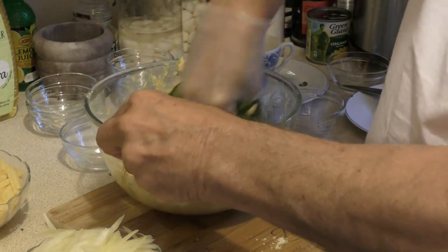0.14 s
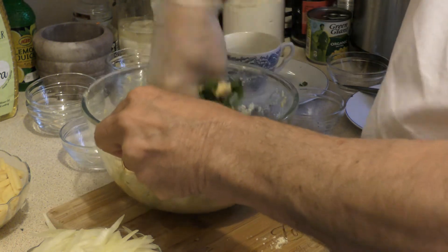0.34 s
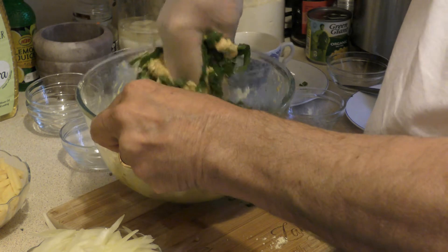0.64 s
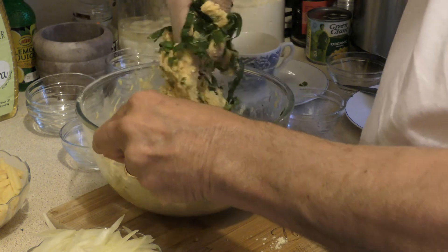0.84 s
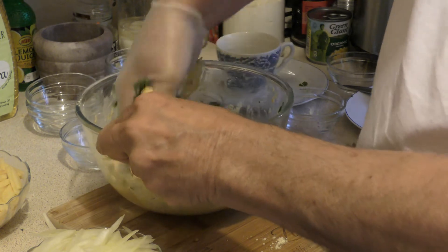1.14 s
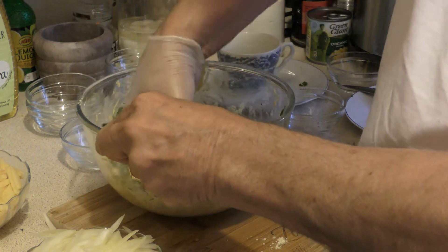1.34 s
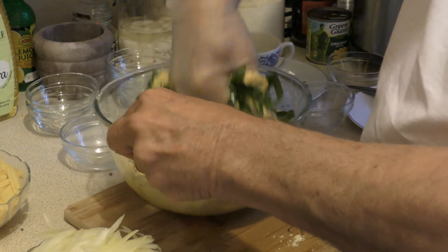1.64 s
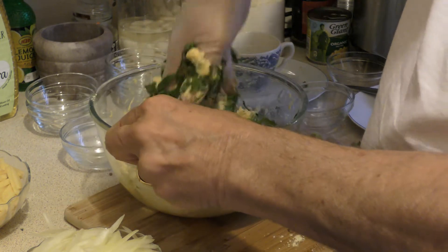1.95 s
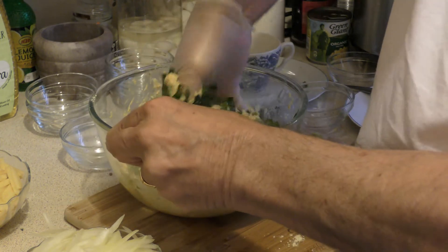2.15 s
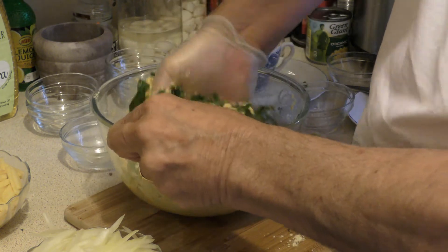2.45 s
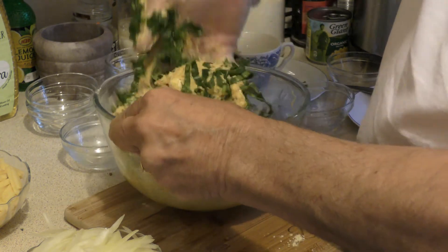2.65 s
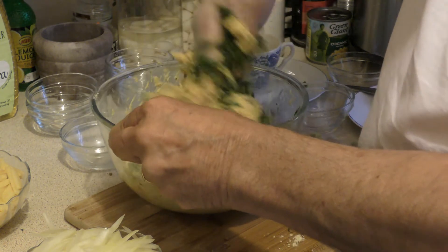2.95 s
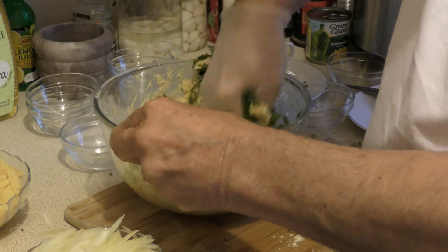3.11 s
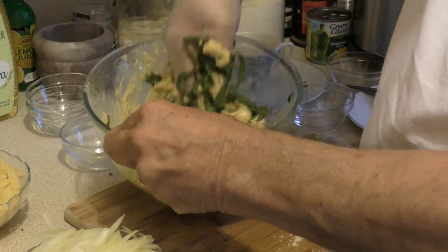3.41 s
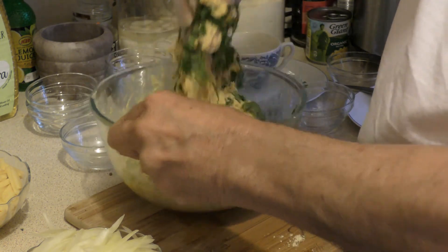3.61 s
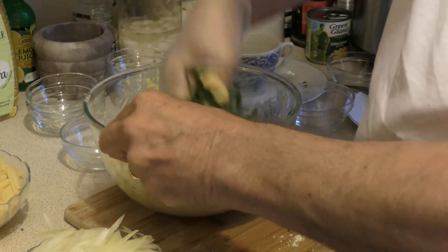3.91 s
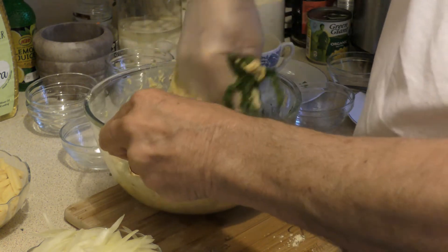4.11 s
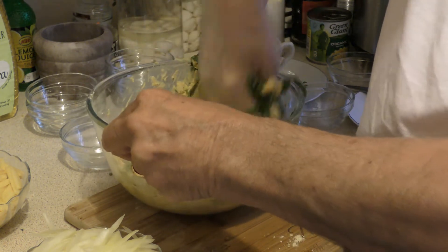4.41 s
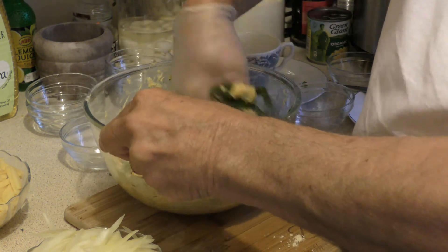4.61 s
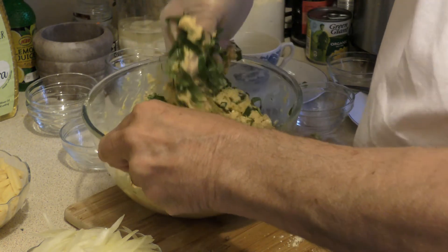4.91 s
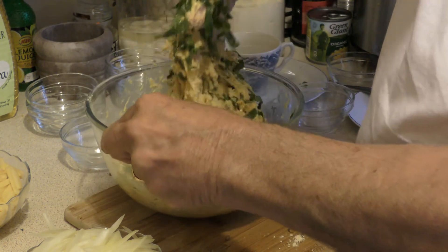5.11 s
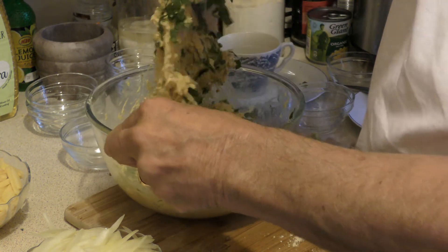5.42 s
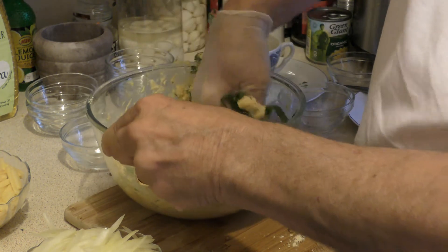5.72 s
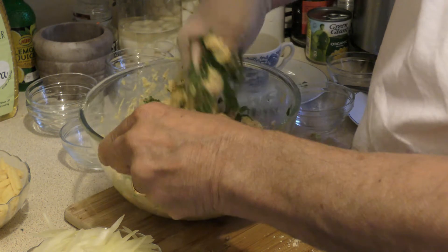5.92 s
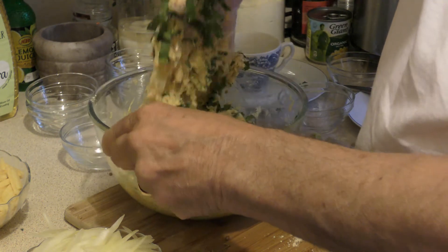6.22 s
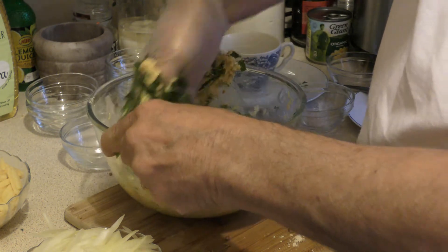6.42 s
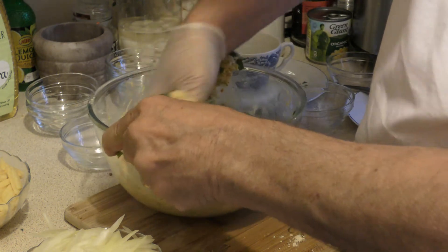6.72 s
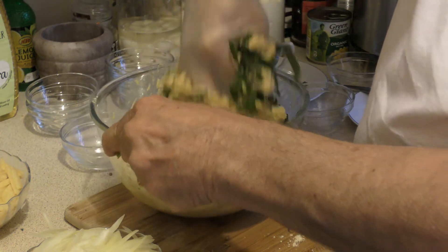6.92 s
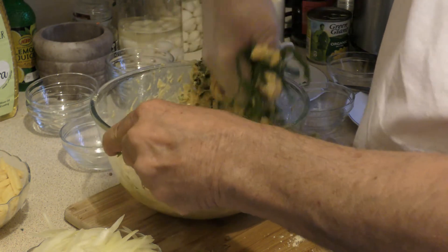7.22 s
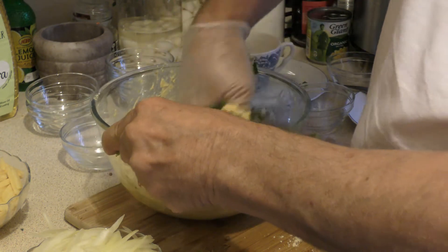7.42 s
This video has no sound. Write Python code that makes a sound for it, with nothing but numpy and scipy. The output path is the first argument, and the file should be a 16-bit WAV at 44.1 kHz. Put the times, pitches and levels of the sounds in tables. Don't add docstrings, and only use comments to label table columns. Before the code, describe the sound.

A glass bowl knocks irregularly on a wooden board as a gloved hand squeezes wet, crackling batter; one bright clink against glass dishes in a small kitchen.

```python
import sys
import numpy as np
from scipy import signal
from scipy.fft import rfft, irfft, next_fast_len
from scipy.io import wavfile
from scipy.ndimage import uniform_filter1d

SR = 44100
rng = np.random.default_rng(int(sys.argv[2]) if len(sys.argv) > 2 else 0)


def ratio(d):
    e = np.asarray(d, float) / 20
    return 10 ** e


def store_wav(level_fs):
    pcm = np.round(np.clip(np.atleast_2d(level_fs), -1, 1) * 32767)
    wavfile.write(sys.argv[1], SR, pcm.T.astype(np.int16))


N = 332954

# t/s, blow/dB, counter thump/dB, crack/dB, first edge/dB
DROPS = [
    (0.796, -8, -21, -13, -40),
    (1.604, -13.5, -23.5, -10, -22),
    (2.849, -11, -19, -57, -12),
    (3.652, -6.5, -23.5, -21, -57),
    (4.292, -19.5, -16, -29, -19.5),
    (5.081, -9, -17.5, -29, -12.5),
    (6.136, -11, -15.5, -47, -33),
    (7.139, -14.5, -14, -39, -9),
]
# main board pitch f/Hz, ring/dB, rebound delay/s, rebound/dB
DROP_RINGS = [(1006, -8, .0016, -1.5), (1423, -7.5, 0.00119, -8.5), (1380, -7, .002, -7),
              (1288, -8, .0018, -5), (1380, -8, .002, -10), (1330, -10.5, .0015, -10),
              (1374, -14.5, 0.00201, -9.5), (1340, -5, 0.00155, -9)]
# f/Hz, width/Hz, level/dB
BOARD_MODES = [(760, 260, -14), (980, 240, -4), (1160, 260, -4), (1380, 260, 1), (1600, 320, -5),
               (1830, 340, -6), (2090, 380, -6), (2450, 480, -8), (2920, 560, -6), (3480, 750, -7),
               (4300, 1000, -8), (5600, 1500, -11)]
# f/Hz, width/Hz, level/dB
COUNTER_MODES = [(109, 61, -6), (182.5, 54, -0.5), (242, 144, 11.5), (361.7, 61, 2), (448, 83, 4)]
CLINK_S = 1.604


def unit_rms(x):
    return x / np.sqrt(np.mean(x ** 2) + 1e-20)


def unit_peak(x):
    return x / np.max(abs(x))


def read(points, hz):
    f, value = np.transpose(points)
    return np.interp(np.log(hz + 1), np.log(f + 1), value)


def add(mix, s, sound):
    part = mix[..., max(round(s * SR), 0):][..., :sound.shape[-1]]
    part += sound[..., :part.shape[-1]]


def colour(x, gain_db):
    size = next_fast_len(N)
    gain = ratio(gain_db(np.fft.rfftfreq(size, 1 / SR)))
    return irfft(rfft(x, size) * gain, size)[..., :N]


def causal(x, gain_db):
    log_gain = np.log(ratio(gain_db(abs(np.fft.fftfreq(4096, 1 / SR)))))
    taps = np.fft.ifft(np.exp(np.conj(signal.hilbert(log_gain)))).real[:2048]
    return signal.oaconvolve(x, taps)[:N]


def band(x, order, edges_hz):
    return signal.lfilter(*signal.butter(order, edges_hz, "band", fs=SR), x)


def whitened(x, size):
    z = rfft(x)
    return irfft(z / np.sqrt(uniform_filter1d(abs(z) ** 2, size=size)))


def grains(per_s, spread_db):
    draw, size, sign = rng.random((N, 3)).T
    level = ratio(-spread_db * np.log(size + 0.0037))
    return (draw < per_s / SR) * level * np.sign(sign - .5)


def resonate(x, hz, width_hz):
    turn = np.exp(2j * np.pi * np.cumsum(hz) / SR)
    r = np.exp(-np.pi * width_hz / SR)
    return 2 * (turn * signal.lfilter([1 - r], [1, -r], x / turn)).real


def ring(modes, chance, spread_db, damping):
    hz, width_hz, db = np.transpose(modes)[:, :, None]
    t = np.arange(4000) / SR
    u, v = chance[:, :len(modes), None] - .5
    sign = (-1.) ** np.arange(len(modes))[:, None]
    decay = np.exp(-np.pi * damping * width_hz * t)
    tones = np.sin(2 * np.pi * hz * (1 + .05 * v) * t)
    return unit_peak((sign * ratio(db + spread_db * u) * decay * tones).sum(0))


def hum():
    # f/Hz, density/dB
    hum_db = [(12, -37), (20, -12), (53, -4), (198, -6), (285, -12), (347, 0), (377, -14), (472, -11),
              (574, -28), (849, -22), (1090, -9), (1760, -15), (2910, -11), (4300, -25), (16000, -27)]
    # f/Hz, correlation/1
    likeness = [(60, 0.24), (180, 0.67), (550, 0.4), (1650, 0.57), (4970, 0.3), (15000, 0.24)]
    frames, hz = N // 256 + 5, np.fft.rfftfreq(1024, 1 / SR)
    a, b, c, d, patches = rng.standard_normal((frames, 513, 5)).T
    patches = uniform_filter1d(patches, size=12, axis=0)
    patches = unit_rms(uniform_filter1d(patches, size=14, axis=1))
    same = np.clip(read(likeness, hz), -1, 1)[:, None]
    left = a + 1j * b
    z = np.array([left, same * left + np.sqrt(1 - same ** 2) * (c + 1j * d)])
    z *= ratio(read(hum_db, hz)[:, None] + patches)
    return ratio(-57.5) * unit_rms(signal.istft(z, nperseg=1024, noverlap=768)[1][:, :N])


def kitchen(x, alike):
    # f/Hz, t60/s
    room_t60_s = [(100, 0.49), (260, 0.29), (700, 0.31), (1840, 0.31), (4850, 0.23), (12000, 0.063)]
    taps = np.zeros((6, SR // 2))
    at = np.arange(120, SR // 2 - 20, 20) + rng.integers(0, 20, (6, (SR // 2 - 121) // 20))
    np.put_along_axis(taps, at, rng.choice([-1., 1.], at.shape), 1)
    alike = np.clip(alike, 0, 1)
    taps = np.sqrt(alike) * taps[[0, 0, 1, 1]] + np.sqrt(1 - alike) * taps[2:]
    hz, t, z = signal.stft(taps, SR, nperseg=256)
    tail = signal.istft(z * ratio(-60 * t / read(room_t60_s, hz)[:, None]), SR, nperseg=256)[1]
    turn = 2 * np.pi * .31 * np.arange(N) / SR
    shares = x * np.array([np.cos(turn), np.cos(turn), np.sin(turn), np.sin(turn)])
    wet = signal.fftconvolve(shares, tail / np.linalg.norm(tail[0]), axes=1)[:, :N]
    return wet[:2] + wet[2:]


def clink():
    # f/Hz, level/dB
    glass_modes = [(2286, -53.5), (2387, -52), (2451, -59), (2885, -58), (3160, -60), (3440, -58),
                   (4027, -64), (4452, -65), (4786, -62), (4818, -43.5), (4894, -54), (5766, -61),
                   (5960, -61), (6062, -58), (6562, -63), (7320, -59), (7714, -67), (8150, -58),
                   (8220, -52), (8300, -56), (9300, -72), (10600, -71), (12350, -65), (13030, -71),
                   (14090, -69), (15040, -69)]
    # f/Hz, t60/s
    glass_t60_s = [(2300, .42), (3500, .3), (4850, .6), (6000, .3), (8200, .42), (12000, .3), (15000, .3)]
    hz, db = np.transpose(glass_modes)[:, :, None]
    t = np.arange(SR // 2) / SR
    strike = (1 + 4 * (hz < 3000) * np.exp(-t / 0.005)) * (1 - np.exp(-t / 0.00018))
    wander = uniform_filter1d(rng.standard_normal((len(glass_modes), SR // 2)), size=600)
    flutter = ratio(1.8 * unit_rms(wander))
    decay = ratio(db - 60 * t / read(glass_t60_s, hz))
    tone = (decay * strike * flutter * np.sin(2 * np.pi * hz * t)).sum(0)
    stilled_db = -110 * np.maximum(t + CLINK_S - 1.74, 0)
    out = np.zeros(N)
    add(out, CLINK_S, ratio(19.5 + stilled_db) * tone)
    return out


def spray(db, t60_s, band_hz):
    t = np.arange(14000) / SR
    a, b, c, grain = rng.standard_normal((4, 14000))
    grain_db = 3.0 * unit_rms(uniform_filter1d(grain, size=90))
    noise = np.array([a + .45 * b, a + .45 * c]) * ratio(grain_db)
    noise = unit_rms(band(noise, 2, band_hz))
    return ratio(db - 60 * t / t60_s) * (1 - np.exp(-t / 0.0037)) * noise


def washes():
    out = np.zeros((2, N))
    for s, db, *_ in DROPS:
        add(out, s, spray(db - 27, t60_s=0.35, band_hz=(890, 3800)))
    add(out, CLINK_S, spray(-30, t60_s=0.3, band_hz=(2200, 8340)))
    return out


def ping(db, hz, t60_s, rise_cycles):
    t = np.arange(round(np.clip(t60_s, .01, .4) * SR)) / SR
    sway = 1 + .12 * unit_rms(uniform_filter1d(rng.standard_normal(18000), size=120))[:len(t)]
    shape = (1 - np.exp(-t * hz / rise_cycles)) * ratio(-60 * t / (len(t) / SR))
    return ratio(db) * unit_peak(shape * np.sin(2 * np.pi * np.cumsum(hz * sway) / SR))


def lumps():
    # t/s, peak/dB, f/Hz, t60/s
    lump_rows = [(0.354, -45, 334, 0.12), (0.389, -43, 420, 0.12), (0.796, -14, 342, 0.12),
                 (1.792, -41, 310, 0.11), (2.547, -40, 170, 0.11), (2.846, -29, 221, 0.12),
                 (3.651, -18.5, 490, 0.11), (3.704, -28, 266, 0.14), (3.739, -32, 541, 0.14),
                 (3.774, -33, 513, 0.12), (3.804, -27, 143, 0.12), (3.819, -35, 119, 0.12),
                 (3.97, -41, 302, 0.12), (4.056, -44, 339, 0.11), (4.526, -45, 350, 0.16),
                 (5.076, -17.5, 263, 0.16), (5.119, -28, 355, 0.12), (6.133, -26, 260, 0.13),
                 (7.134, -18.5, 353, 0.17), (7.174, -29, 237, 0.1)]
    # t/s, peak/dB, f/Hz, t60/s
    wobble_rows = [
        (0.79, -36, 59.5, .1),
        (0.96, -52, 60, .2),
        (1.6, -47, 50, 0.085),
        (3.79, -49, 55, .3),
        (5.1, -54, 50, 0.38),
        (6.17, -49, 59.6, .3),
        (7.2, -57, 50, .3),
    ]
    # t/s, peak/dB, f/Hz, t60/s
    tap_rows = [(0.195, -35, 1150, 0.058), (1.272, -31, 1880, 0.046), (1.953, -32, 1870, 0.05),
                (2.146, -38, 1950, 0.05), (2.1919, -34, 2010, 0.05), (2.2782, -37.5, 2040, 0.05),
                (2.3494, -44, 1670, 0.05), (2.4494, -41, 1670, 0.05), (3.057, -38.5, 1340, 0.054),
                (3.7094, -22, 1670, 0.05), (3.929, -26.5, 2300, 0.058), (3.9709, -30, 1330, 0.05),
                (4.1494, -43, 2730, 0.05), (4.5994, -47, 1540, 0.05), (4.803, -46, 1160, 0.05),
                (4.8394, -39, 1160, 0.05), (5.1694, -29, 1140, 0.046), (5.252, -34, 1130, 0.05),
                (7.2174, -27, 1046, 0.05), (7.4036, -39, 1280, 0.05)]
    out = np.zeros(N)
    for (s, db, *_), (hz, ring_db, *_) in zip(DROPS, DROP_RINGS):
        add(out, s + 0.00058, ping(db + ring_db, hz, t60_s=0.023, rise_cycles=1.3))
    add(out, 6, ping(-23.5, 780, t60_s=0.32, rise_cycles=0.95))
    groups = ((lump_rows, -8.0, .55, .5), (wobble_rows, 0.0, .9, .8), (tap_rows, -11.0, .35, 1.2))
    for rows, trim_db, damped, rise_cycles in groups:
        for s, db, hz, t60_s in rows:
            add(out, s - .001, ping(db + trim_db, hz, damped * t60_s, rise_cycles))
    return out


def slides():
    # t/s, level/dB, chatter f/Hz, rasp re chatter/dB
    skid_tables = [
        [(0.0, -21.5, 780, -24), (0.02, -38.5, 765, -45), (0.1, -61, 740, -24)],
        [(0.6, -66, 1270, 2), (0.606, -67, 1280, -11), (0.626, -60, 1140, -31), (0.68, -41.5, 1170, -48),
         (0.77, -34.5, 1310, -41), (0.79, -45, 1440, 4)],
        [(0.82, -46, 1250, 6), (0.932, -45.5, 1230, -1.5), (0.974, -46.5, 1360, -3), (1.112, -60, 1200, -25),
         (1.21, -75, 1200, -17)],
        [(1.515, -52, 1180, -14), (1.525, -45.5, 1230, 2.5), (1.559, -43, 1560, 6), (1.597, -43.5, 1560, 4),
         (1.6, -9, 1710, 9)],
        [(3.62, -71, 1870, -18), (3.626, -40.5, 2000, 3), (3.642, -62, 1840, -16), (3.645, -43, 1760, -13)],
        [(3.68, -42, 1670, -16), (3.75, -36.5, 1600, -6.5), (3.83, -46, 1570, -3.5), (3.9, -101, 1380, -25)],
    ]
    out, slips = np.zeros(N), grains(6000, spread_db=0.0)
    rasp = signal.sosfilt(signal.butter(2, [500, 4300], "band", fs=SR, output="sos"), slips)
    for rows in skid_tables:
        s, *columns = np.transpose(rows)
        t = np.arange(s[0], s[-1], 1 / SR)
        db, hz, rasp_db = (np.interp(t, s, c) for c in columns)
        start = round(s[0] * SR)
        part = slice(start, start + len(t))
        chatter = resonate(resonate(slips[part], hz, 450), hz, 700)
        chatter = chatter + .35 * resonate(slips[part], 1.55 * hz, 250)
        sound = unit_rms(chatter) + ratio(rasp_db + 8.0) * unit_rms(rasp[part])
        add(out, s[0], ratio(db - 9.0) * sound * signal.windows.tukey(len(t), .12))
    rub = slips[:round((1.22 - .9) * SR)]
    song = unit_rms(resonate(rub, np.full(len(rub), 2310), 25))
    add(out, .9, ratio(-59) * np.hanning(len(rub)) * song)
    return out


def hand(column, clumpy_db):
    # full grip t/s, let-go time/s, push on the bowl/dB, wet squelch/dB
    squeeze_rows = [(0.005, 0.12, -43, -58), (0.258, 0.62, -56, -53), (0.39, 0.12, -51.5, -67),
                    (0.71, 0.22, -41, -51.5), (0.95, 0.23, -40, -79), (1.1, 0.15, -46, -57),
                    (1.253, 0.33, -55.5, -55.5), (1.53, 0.15, -57, -52.5), (1.8, 0.65, -54, -57.5),
                    (1.964, 0.096, -53, -54), (2.15, 0.68, -52.5, -57), (2.35, 0.91, -74, -57.5),
                    (2.59, 0.4, -52.5, -56.5), (3.06, 0.13, -54, -57.5), (3.198, 0.12, -48, -46),
                    (3.37, 0.95, -56.5, -57), (3.6, 0.23, -60, -64), (3.931, 0.12, -47, -55.5),
                    (4.14, 0.61, -52.5, -57), (4.52, 0.31, -55, -56), (4.81, 0.61, -51, -54.5),
                    (5.25, 0.24, -62, -83), (5.68, 0.1, -47, -56), (5.881, 0.33, -51, -58.5),
                    (6.1, 0.58, -58, -61), (6.48, 0.36, -55.5, -61), (6.78, 0.4, -53.5, -56),
                    (7.04, 0.51, -82, -57.5), (7.3, 0.45, -76, -58), (7.42, 0.65, -54, -55.5)]
    s, let_go_s, db = np.transpose(squeeze_rows)[[0, 1, column], :, None]
    hop = 300
    clumps = unit_rms(uniform_filter1d(rng.standard_normal(N // hop + 2), size=4))
    steps = np.arange(len(clumps))
    since = (steps * hop / SR - s) / let_go_s
    grip = ratio(db - 20.5 * np.maximum(since, -since / 0.61))
    rest = ratio(-74)
    level = np.sqrt((grip ** 2).sum(0) + rest ** 2) * ratio(clumpy_db * clumps)
    return np.interp(np.arange(N) / hop, steps, level)


def drag():
    flat = np.full((2, 16), .5)
    board = ring(BOARD_MODES, flat, spread_db=0, damping=5.3)
    counter = ring(COUNTER_MODES, flat, spread_db=0, damping=0.13)
    wood = signal.oaconvolve(grains(2500, spread_db=3.0), board)[:N]
    low = signal.oaconvolve(grains(300, spread_db=-6.0), counter)[:N]
    push = np.minimum(hand(column=2, clumpy_db=2.5), ratio(-48))
    load = (hand(column=2, clumpy_db=4.5) / ratio(-52.5)) ** 0.85
    return ratio(-7.5) * push * unit_rms(wood) + ratio(-71.5) * load * unit_rms(low)


def squeeze():
    # f/Hz, density/dB
    fizz_db = [(880, -78), (1500, 1), (2040, 0), (2660, -3.5), (2970, -0.5), (4500, -7), (10100, -8),
               (14100, -12.5), (16000, -17)]
    # t/s, peak/dB, f/Hz, band spread factor/1
    pop_rows = [(0.127, -45, 9200, 1.8), (0.241, -31, 4650, 1.8), (0.388, -31, 4570, 2.3),
                (0.4403, -37, 6550, 2), (0.525, -46.5, 4100, 1.9), (0.606, -38.5, 4500, 1.95),
                (1.101, -40, 8340, 1.7), (1.2487, -26, 5560, 1.44), (1.5726, -39, 4040, 1.9),
                (1.8886, -41, 5820, 1.4), (2.3466, -42, 4710, 1.44), (2.597, -34, 4860, 2.4),
                (2.6185, -43.5, 4470, 1.1), (3.1996, -29.5, 6330, 1.9), (3.5269, -48, 6990, 1.1),
                (3.602, -34.5, 6900, 1.6), (3.928, -39.5, 7300, 1.12), (4.088, -40, 7740, 1.24),
                (4.3024, -23.5, 6300, 1.48), (4.4844, -44, 6100, 1.6), (6.214, -41, 6860, 1.6),
                (6.4, -47, 5440, 1.2), (6.7774, -38, 10900, 1.3), (7.0397, -31, 5720, 1.14)]
    fizz = [colour(grains(6000, spread_db=2.5), lambda hz: read(fizz_db, hz)) for _ in range(3)]
    ears = np.array([fizz[0] + 0.43 * fizz[1], fizz[0] + 0.31 * fizz[2]])
    out = ratio(2.0) * hand(column=3, clumpy_db=3.0) * unit_rms(ears)
    t = np.arange(6000) / SR
    for s, db, hz, spread in pop_rows:
        pan_db = -0.5 + 6 * rng.uniform(-1, 1)
        spread = max(spread, 1.04)
        puff = band(rng.standard_normal(6000), 2, np.clip([hz / spread, hz * spread], 500, 20000))
        decay = np.exp(-t / 0.0015) + 0.23 * np.exp(-t / 0.03)
        pop = unit_peak(puff * (1 - np.exp(-t / 0.00066)) * decay)
        add(out, s, ratio(db - 2.0 + np.array([[.5], [-.5]]) * pan_db) * pop)
    return out


def blow(db, thump_db, crack_db, soft_hz, chance, grit):
    t = np.arange(4000) / SR
    force = (np.arange(4000) == 0) + .02 * grit * np.exp(-t / .003)
    force = signal.lfilter(*signal.butter(3, soft_hz, fs=SR), force)
    board = ring(BOARD_MODES, chance, spread_db=1.5, damping=1.8)
    wood = unit_peak(signal.oaconvolve(force, board)[:4000])
    chatter = whitened(grit[::-1] * np.exp(-t / 0.0034), size=13) * np.exp(-t / .03)
    rattle = ratio(-5) * unit_peak(band(chatter, 2, [850, soft_hz]))
    counter = ring(COUNTER_MODES, chance[:, ::-1], spread_db=-2.5, damping=0.94)
    thump = counter * (1 - np.exp(-t / 0.0023))
    top_hz = np.clip(9000 * ratio(1.1 * (crack_db + 2.0)), 5000, 19000)
    snap = whitened(grit * np.exp(-t / .0012), size=61) * np.exp(-t / .004)
    crack = unit_peak(band(snap, 1, [3000, top_hz]))
    return ratio(db) * (wood + rattle + ratio(thump_db + 10.5) * thump + ratio(crack_db + 17.5) * crack)


def knocks():
    # t/s, blow/dB, counter thump/dB, crack/dB
    rock_rows = [(0.008, -36.5, 1, -39), (0.196, -35.5, -12, -20), (0.355, -60, 12.5, -30),
                 (0.607, -59, 7, -30), (0.677, -41.5, 1.5, -32), (1.273, -42, -9, -35),
                 (1.524, -29.5, -11, -32), (1.794, -42.5, -6, -27), (1.955, -41.5, -32, -15),
                 (2.279, -48, -12, -17), (2.548, -48.5, -2.5, -30), (3.057, -42, -33, -32),
                 (3.201, -39, -4, -33), (3.626, -43.5, 1, -30), (3.784, -27, -8, -39),
                 (3.82, -33.5, -9.5, -64), (3.931, -37.5, -8.5, -18), (3.971, -33.5, -8.5, -31),
                 (4.06, -53, 3.5, -35), (4.527, -47, -1, -27), (4.804, -49, -3.5, -25.5),
                 (5.254, -40, -12, -36), (5.679, -55, 5, -13), (5.879, -29, -11, -38),
                 (5.972, -42.5, -14, -23), (6.793, -30.5, -10, -34), (6.974, -28, -13.5, -45),
                 (7.403, -65, -40, -33), (7.459, -45, -3.5, -30)]
    out = np.zeros(N)
    for (s, db, thump_db, crack_db, edge_db), (*_, again_s, again_db) in zip(DROPS, DROP_RINGS):
        chance, grit = rng.random((3, 2, 16)), rng.standard_normal((3, 4000))
        edge = blow(db + edge_db, thump_db + 10.0, crack_db - 30, 3000, chance[1], grit[1])
        slam = blow(db - 1.5, thump_db - 2.5, crack_db, 3200, chance[0], grit[0])
        rebound = -blow(db + again_db - 2.5, thump_db, crack_db, 3500, chance[2], grit[2])
        jolt = ratio(db + crack_db - 13) * np.hanning(round(0.011 * SR))
        add(out, s - 0.005384, edge)
        add(out, s - .001, jolt)
        add(out, s - .0004, slam)
        add(out, s + again_s, rebound)
    for s, db, thump_db, crack_db in rock_rows:
        chance, grit = rng.random((2, 16)), rng.standard_normal(4000)
        add(out, s - .0006, blow(db, thump_db - 2.5, crack_db, 1720, chance, grit))
    return out


def scene():
    # f/Hz, gain/dB
    path_db = [(300, 0), (520, 0.5), (700, -3), (860, -4), (1000, 4.5), (1700, 2.5), (2300, 4.5), (3500, 0),
               (6000, -4), (10000, 1)]
    # f/Hz, difference/dB
    lean_db = [(60, 3.5), (250, 0.5), (550, -3), (1500, -2), (4000, -0.5), (12000, -2.5)]
    board, wet = knocks() + drag() + slides(), squeeze()
    glass, close = clink(), lumps()
    echo = kitchen(board + ratio(-8.5) * close + ratio(-2.5) * glass, alike=0.59)
    board = board + ratio(0.5) * glass + close + washes() + ratio(-5.5) * echo
    leaning = [causal(ear, lambda hz: read(path_db, hz) + side * read(lean_db, hz))
               for ear, side in zip(board, (.5, -.5))]
    return np.array(leaning) + wet + ratio(-8.0) * kitchen(wet.mean(0), alike=0.59) + hum()


def top_cut(x):
    return signal.sosfilt(signal.butter(12, 16820, fs=SR, output="sos"), x)


def record(dry):
    edge = signal.firwin(401, 15780, window=("kaiser", 8), fs=SR)
    mix = signal.oaconvolve(dry, edge[None], "same")
    return top_cut(mix)


dry = scene()
out = record(dry)
store_wav(out)
```